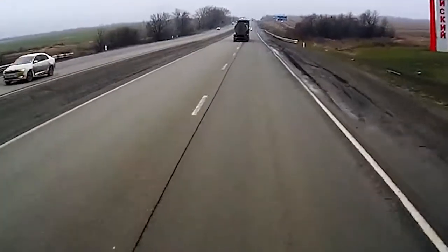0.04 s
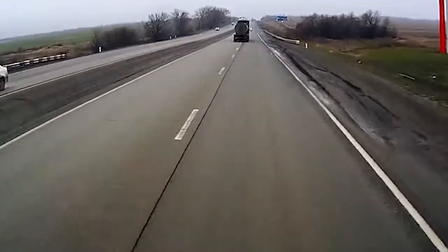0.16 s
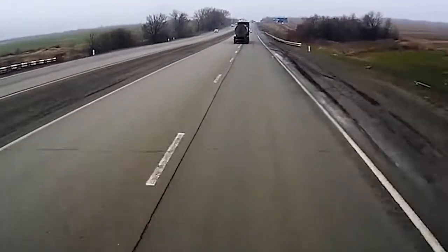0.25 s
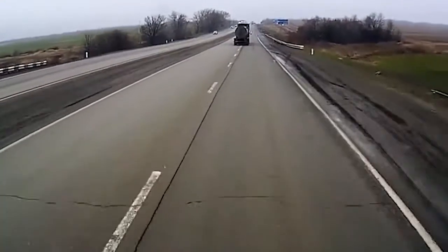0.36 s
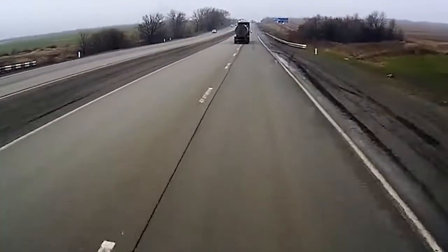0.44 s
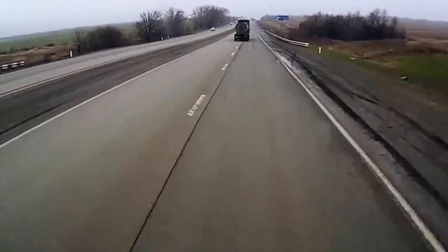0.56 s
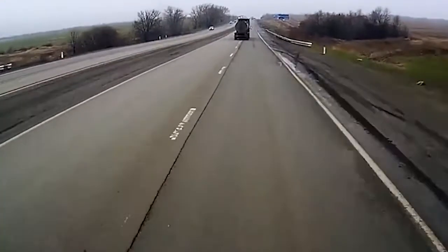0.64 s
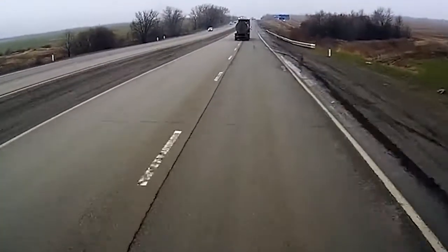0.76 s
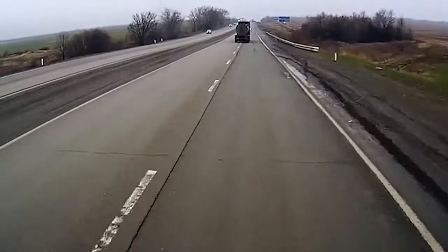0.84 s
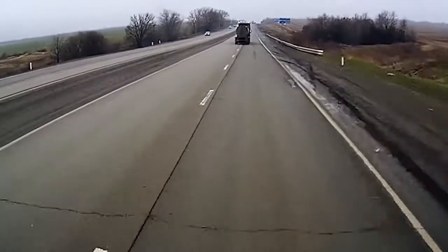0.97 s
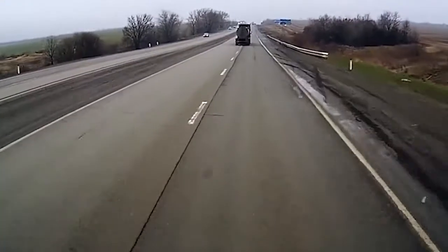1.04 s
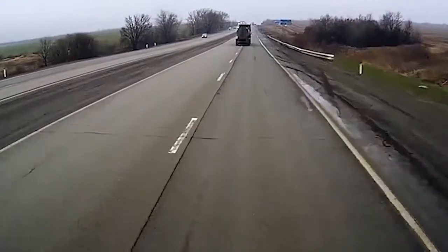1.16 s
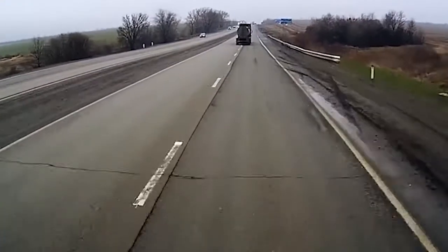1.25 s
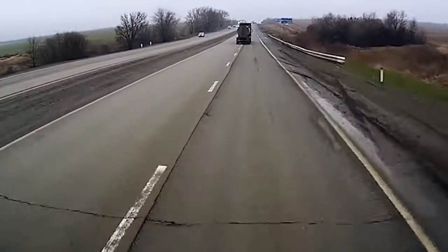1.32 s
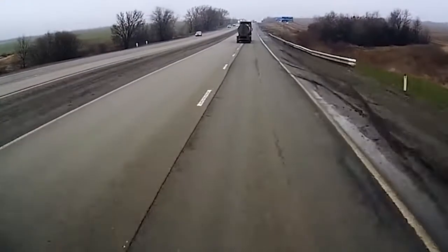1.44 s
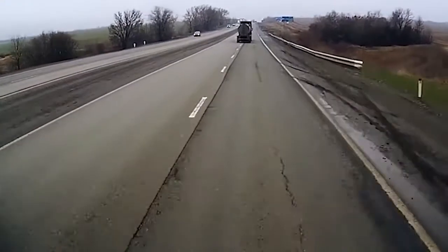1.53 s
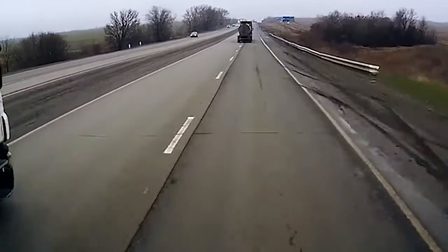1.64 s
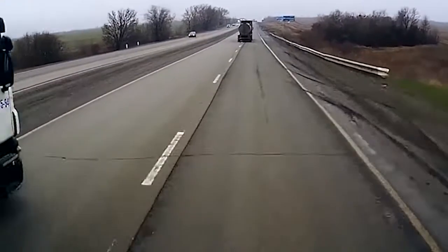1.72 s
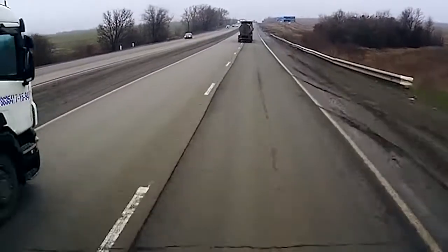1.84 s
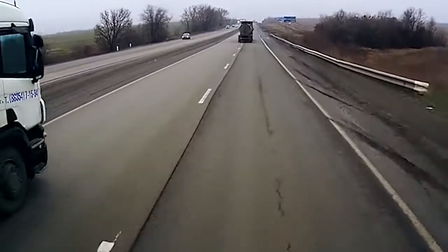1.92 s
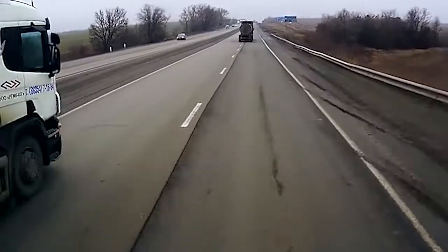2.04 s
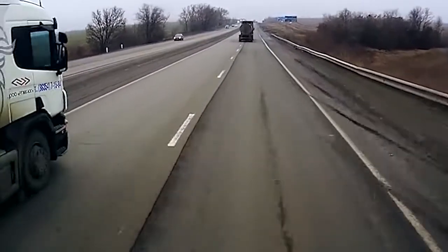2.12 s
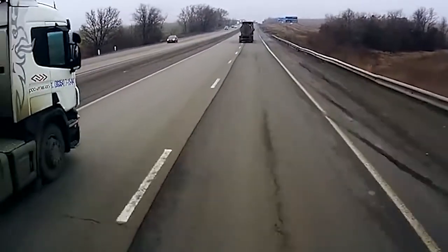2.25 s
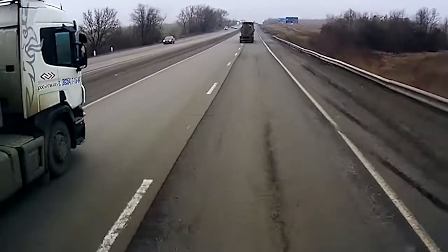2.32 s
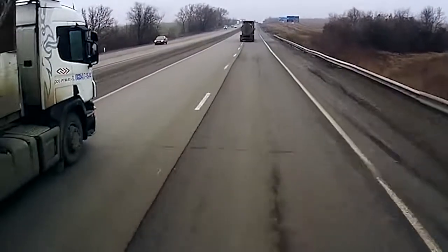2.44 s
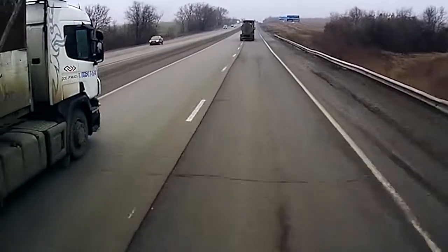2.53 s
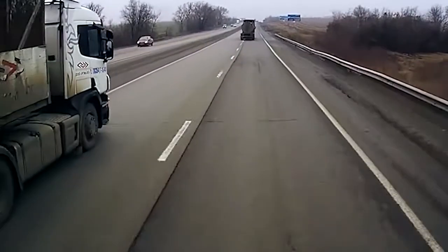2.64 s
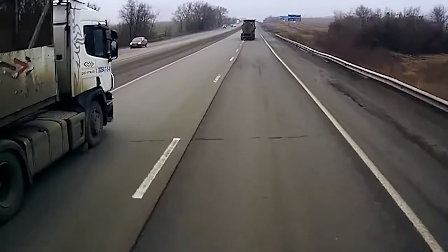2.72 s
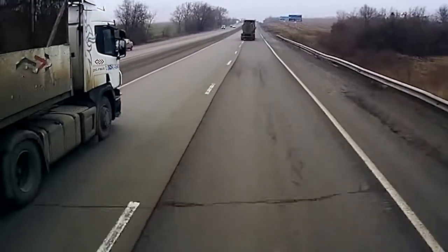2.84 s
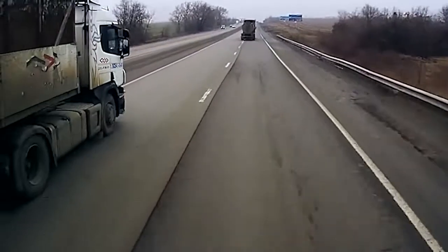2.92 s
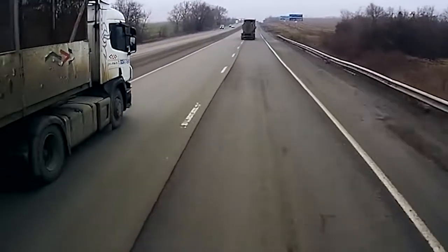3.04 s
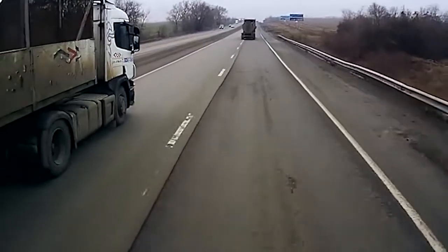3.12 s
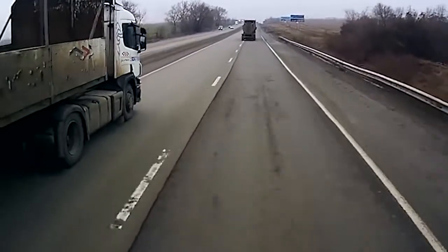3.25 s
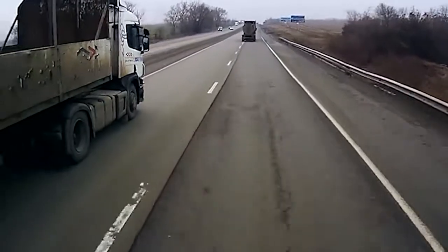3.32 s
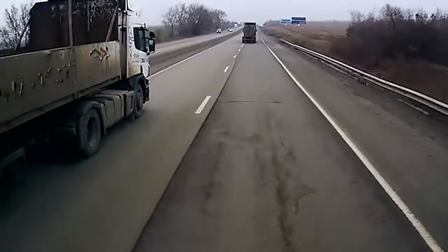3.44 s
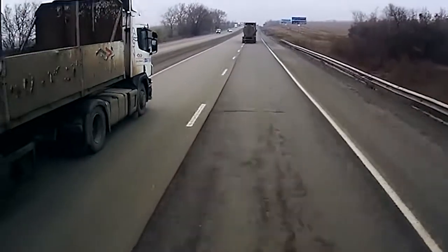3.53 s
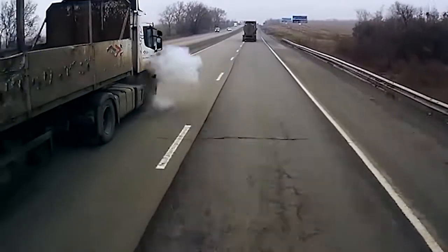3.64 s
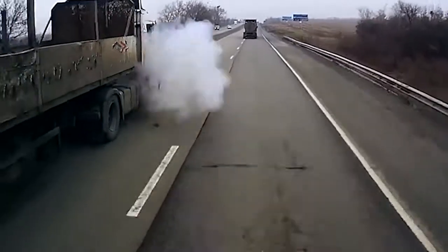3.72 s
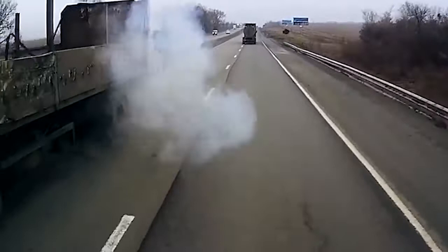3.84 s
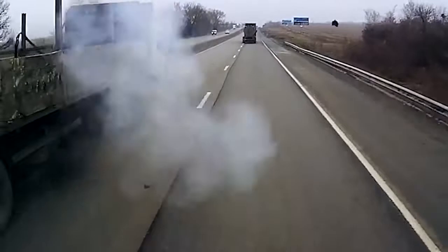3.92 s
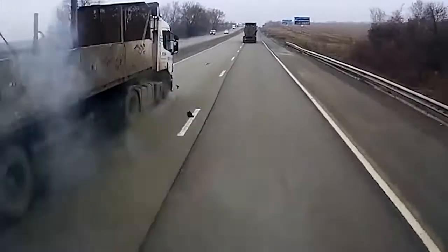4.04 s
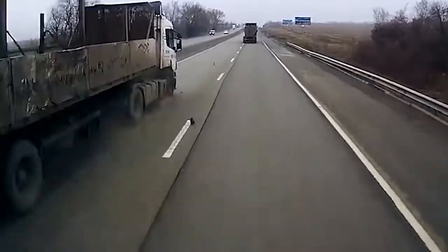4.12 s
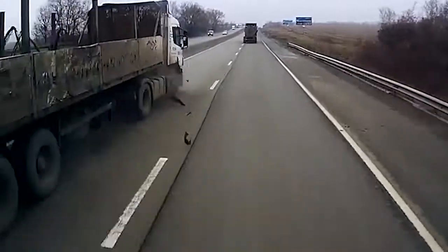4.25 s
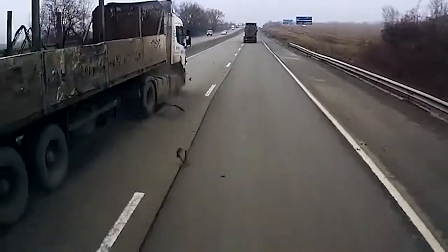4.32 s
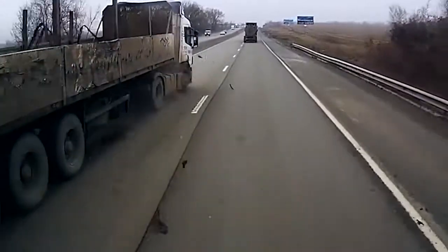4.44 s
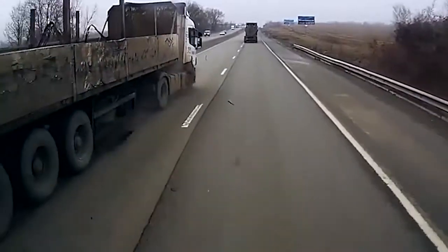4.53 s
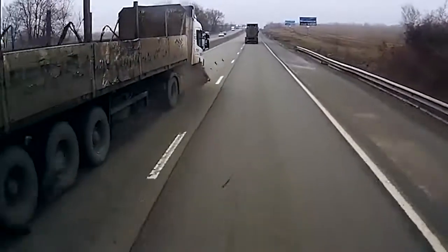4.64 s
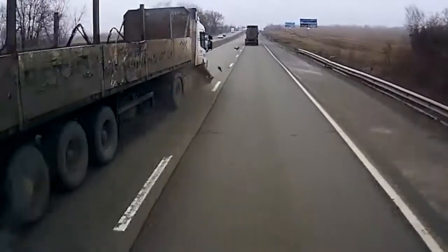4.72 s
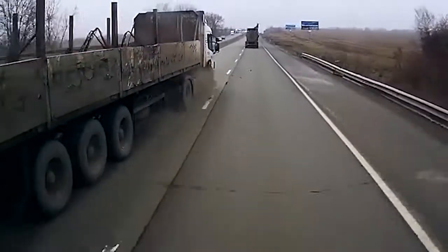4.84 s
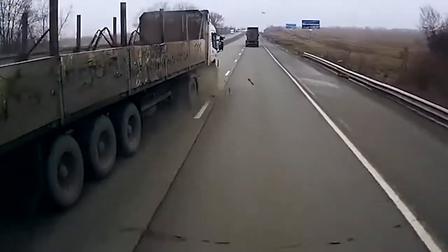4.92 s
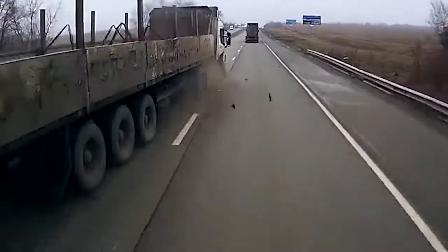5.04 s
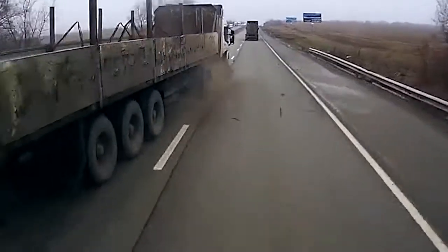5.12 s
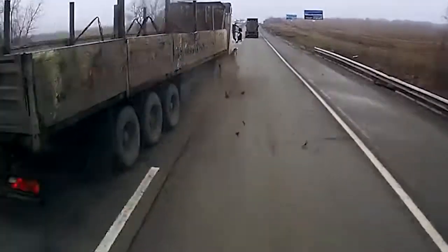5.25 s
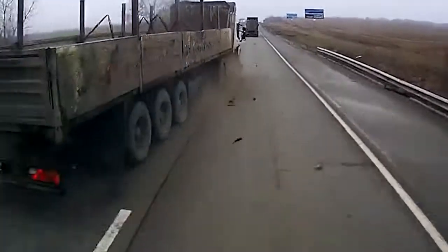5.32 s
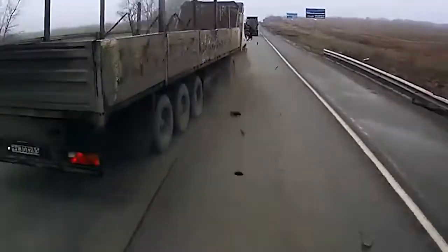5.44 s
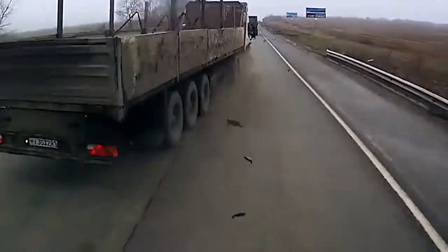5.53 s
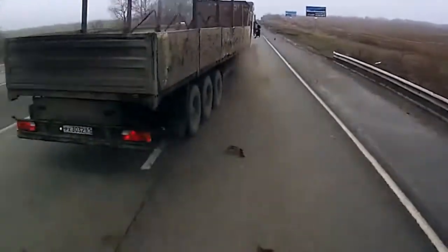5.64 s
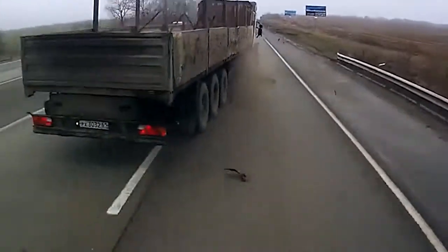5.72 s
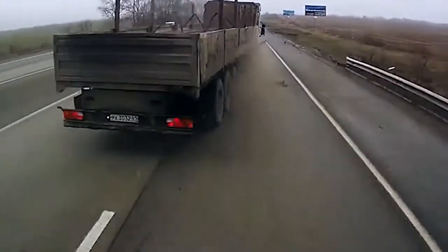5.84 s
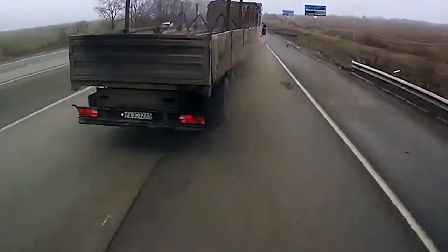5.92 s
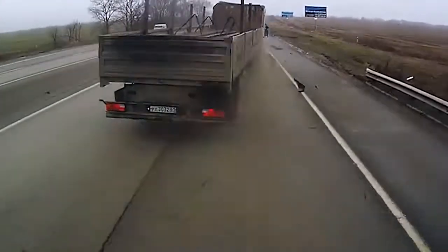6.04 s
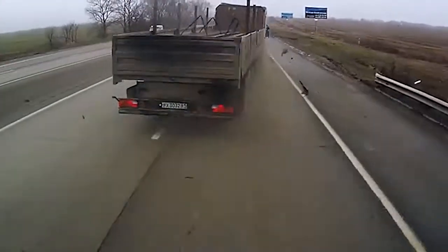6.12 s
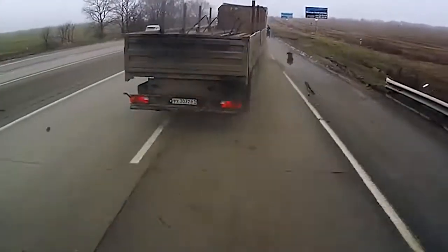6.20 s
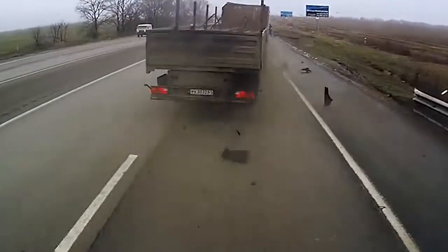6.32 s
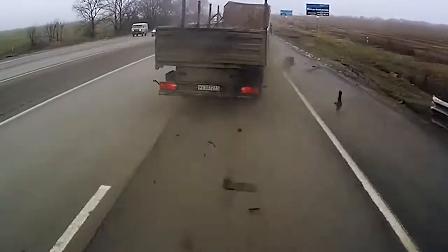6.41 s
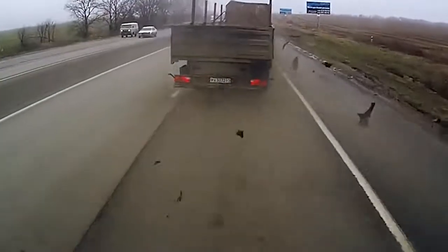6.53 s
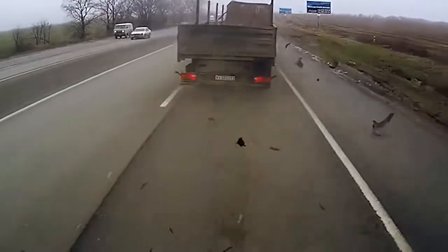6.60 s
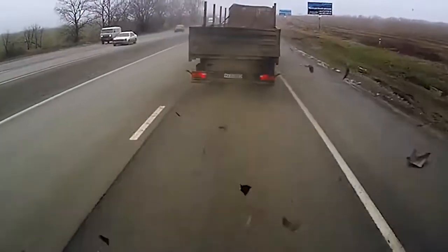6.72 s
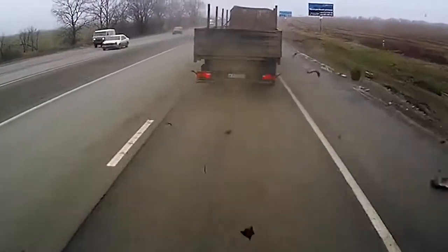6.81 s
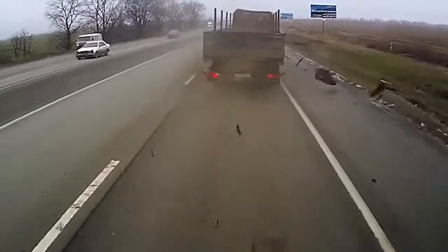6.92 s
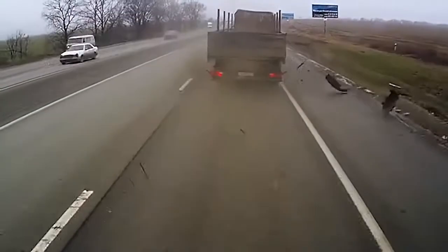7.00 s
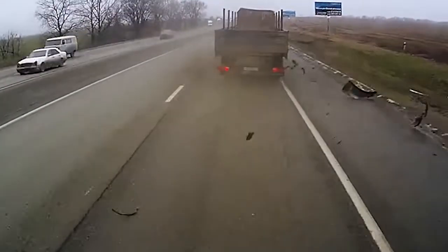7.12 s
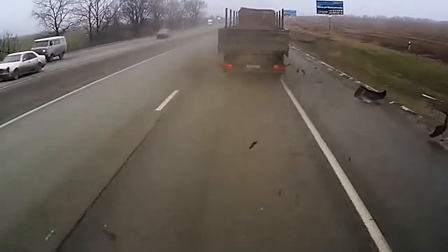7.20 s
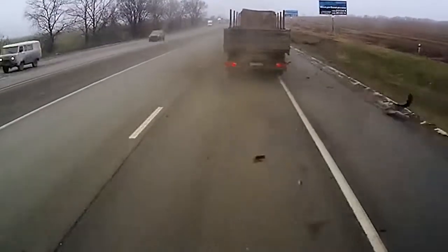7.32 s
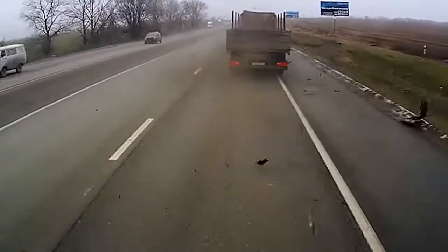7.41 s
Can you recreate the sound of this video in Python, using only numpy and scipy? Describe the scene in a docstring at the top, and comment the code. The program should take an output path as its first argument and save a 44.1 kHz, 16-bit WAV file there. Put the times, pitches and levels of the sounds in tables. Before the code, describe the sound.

A dashboard microphone in an enclosed cab hears deep rumble, dull road roar and wavering tyre whine. Nearly four seconds in, a nearby tyre explodes in a rapid volley of shocks, distorted and boomy, with cracking and rattling. A low rough drone and patchy scuffing follow, with grit and tiny plastic squeaks. Two seconds later, tread slaps the bodywork in quick deep thuds, panels shudder, and last pieces knock and tick over softening road noise.

```python
"""Tyre burst beside a lorry cab

Inside a lorry cab at highway speed, filtered noise makes rumble and roar as an articulated truck overtakes.
One of its tyres bursts: shock fronts and ringing modes boom in the cab and overload the microphone input.
The flat tyre drones and scuffs as narrow-band and patchy noise. A heavy strip of tread thuds as dying sines;
smaller pieces clatter and tick as bursts of ringing noise, over singing treads, squeaks and a panel hum."""
import sys
import numpy as np
from scipy import signal
from scipy.fft import rfft, irfft, next_fast_len
from scipy.io import wavfile
from scipy.ndimage import uniform_filter1d

SR = 44100
rng = np.random.default_rng(int(sys.argv[2]) if len(sys.argv) > 2 else 0)


def file_out(sig):
    """Save sig as 16-bit WAV at sys.argv[1]."""
    # one column per channel
    cols = np.atleast_2d(sig).T
    # limit, then scale
    lim = np.clip(cols, -1, 1)
    pcm = np.round(lim * 32767).astype(np.int16)
    wavfile.write(sys.argv[1], SR, pcm)


N = 329427
TIME = np.arange(N) / SR  # s

# Spectra give relative density in dB per Hz. Swells are bells: width is from the peak to 1/e of the lift.

# shock fronts of the blast and its echoes off trailer and road:
# (t/s, push level/dB, length/s, rise/s, signed strength: + push first, - suction first)
BLAST = [(3.8294, 1.5, 0.005, 0.00072, 0.86), (3.8349, -4, 0.0025, 0.00029, -0.96),
         (3.842, -8, 0.0036, 0.00033, 1), (3.8506, -11, .002, 0.00052, -0.95),
         (3.856, -10, 0.0034, 0.0015, 1), (3.869, -12, .0018, 0.00042, -1),
         (3.879, -12.5, 0.0061, 0.0014, 1), (3.883, -7.5, 0.0029, 0.00038, 1),
         (3.888, -10, 0.0066, 0.00044, -1.2), (3.903, -4.5, 0.0052, 0.0013, 1),
         (3.917, -7.5, 0.0027, 0.0012, -1.1), (3.932, -7.5, 0.0038, 0.00064, 0.96)]
# air modes of the cab: (f/Hz, level/dB, t60/s)
CAB_MODES = [(44.6, -12.5, 0.16), (64.6, -5.5, 0.12), (133.4, -13, 0.21), (263, -7.5, 0.069)]
# casing rips and trim rattles: (t/s, level/dB, tearing time/s, t60/s, tilt/dB per octave)
CRACKS = [(3.8352, -20, 0.0066, 0.035, -2.5), (3.841, -25.5, 0.0085, 0.021, 1),
          (3.855, -40, .002, 0.052, 7), (3.867, -37, .002, 0.036, 1), (3.877, -42, .004, 0.2, 6.5),
          (3.886, -26.5, 0.0062, 0.035, -0.5), (3.918, -46, .002, .04, 9), (3.9295, -37.5, .004, 0.069, 4)]
# spectrum of a crack: (f/Hz, level/dB)
CRACK_SPECTRUM = [(80, 1), (260, -5), (450, 2), (830, 4.5), (1100, -16), (1500, -12.5), (2200, -19),
                  (3100, -19.5), (4000, -34), (5800, -36), (7500, -45), (15000, -57)]

# the flat tyre: (start t/s, attack/s, pulling-away t/s, release/s)
FLAPPING = (3.88, 0.15, 6.38, 0.047)
DRONE_HZ, DRONE_SAG_HZ_PER_S = 314, 26  # pitch at the start, and its fall as the wheel slows
DRONE_DB, DRONE_FAR_DB = -37, -4.5  # level nearby, and the change far ahead
SCUFF_DB, SCUFF_FAR_DB = -44, -9
# the carcass folds under the rim and drones louder: (peak t/s, width/s, extra level/dB)
FOLDS = [(4.145, 0.02, 12), (4.7, 0.028, 8), (4.98, 0.05, 4.5), (5.61, 0.021, 7), (6.13, 0.07, 8.5)]
# spectrum of the scuffing shreds: (f/Hz, level/dB)
SCUFF_SPECTRUM = [(250, -8), (400, 9), (480, 12.5), (560, 21.5), (660, 19.5), (800, 10), (1130, -15),
                  (1600, 7.5), (2200, -3), (3000, -3.5), (3600, -15), (5300, -17), (6500, -32.5),
                  (9000, -27.5), (11000, -37), (15000, -35.5)]
# shreds drag on the road and scuff louder: (peak t/s, width/s, extra level/dB)
DRAGS = [(4.1, 0.035, 3.5), (4.8, 0.09, 3.5), (7.3, 0.071, 6)]

# slaps of a heavy strip of tread on the body: (t/s, level/dB, pitch ratio)
THUMPS = [(5.876, -12.5, 0.34), (5.884, -10, 0.92), (5.899, -7, 1.04), (5.9083, -9, 1.07),
          (5.9336, -9.5, 1), (5.943, -11, 1), (5.9584, -11.5, 1), (5.9856, -12.5, 0.98), (6.020, -19, 1),
          (6.043, -17.5, 1)]
# modes of the lorry body: (f/Hz, level/dB, t60/s)
BODY_MODES = [(51.3, -9.5, 0.5), (120.2, -4.5, 0.2), (138, -14, .3), (163.8, -4, 0.22),
              (240.7, -10.5, 0.26), (341, -13.5, 0.17), (388, -13, 0.15)]
RUBBER_CONTACT_S = .00025  # rounding time of a soft landing
# spectrum of the panels shuddering after a thump: (f/Hz, level/dB)
SHUDDER_SPECTRUM = [(40, -25), (140, 4), (250, 5.5), (390, -8.5), (520, -28), (1500, -56), (5000, -99)]

# fragments strike the front panels:
# (t/s, level/dB, scraping time/s, t60/s, rise/s, tilt/dB per octave, own note f/Hz, note level/dB)
KNOCKS = [(4.728, -33, .004, 0.12, .001, -9, 480, 7), (4.843, -29, 0.0032, 0.078, .002, -5, 894, 10),
          (5.873, -28, 0.0032, 0.038, .0008, 2, 1030, 9),
          (5.878, -32.5, .005, 0.069, 0.0011, 5.5, 1770, 11),
          (5.895, -30.5, 0.0096, .05, 0.00074, 0, 1110, 5), (5.912, -34, 0.0054, 0.1, .001, 2, 1210, 9),
          (6.121, -35, 0.0057, 0.088, .003, 0, 790, 8), (6.14, -31.5, 0.0062, 0.077, 0.0039, 3.5, 1880, 16),
          (6.181, -31, .015, 0.046, 0.005, 4, 705, 15), (6.197, -27, 0.021, 0.085, 0.0013, 1, 755, 3),
          (6.229, -31, 0.015, 0.047, 0.0012, -0.5, 1660, -3), (6.387, -33, .002, .04, .001, -9, 660, 14),
          (6.9448, -32.5, .004, 0.08, 0.00088, 1.5, 2970, 0),
          (6.950, -26.5, 0.012, 0.086, .0006, -0.4, 2000, 2),
          (6.969, -28, .006, 0.17, 0.0016, -3.5, 1080, 1), (6.9955, -28, 0.0036, 0.11, .0006, -1, 1800, -1)]
# spectrum of a struck panel: (f/Hz, level/dB)
PANEL_SPECTRUM = [(150, -10), (380, 15.5), (560, -1.5), (760, 5.5), (1050, -1.5), (1800, -4.5),
                  (2300, -14.5), (3000, -17), (3800, -28), (5200, -30.5), (6800, -46), (9000, -49.5),
                  (15000, -69)]
# grit on the windscreen: (t/s, level/dB, t60/s, tilt/dB per octave)
TICKS = [(2.143, -51, .04, 2), (2.186, -55, .04, 2), (3.678, -54, 0.023, 3), (3.955, -48.5, 0.071, 1),
         (4.087, -40.5, .057, -5), (4.82, -47, 0.036, -1), (5.026, -46, 0.048, 0), (5.228, -52, 0.19, 3),
         (5.352, -52, .025, 12), (5.405, -34.5, 0.015, -0.5), (5.482, -45, 0.092, -2),
         (5.709, -42, 0.036, -2), (5.726, -38, 0.07, -1.5), (5.793, -44, 0.24, -4),
         (5.816, -43, 0.057, -2.5), (5.849, -40, 0.025, 0.5), (6.05, -53, 0.23, 3.5), (6.196, -46, .07, 10),
         (6.251, -55, 0.0083, 12), (6.341, -43, 0.031, -3), (6.496, -57, 0.034, 3), (6.661, -52, .025, 3),
         (6.723, -50.5, .025, 1), (6.788, -46.5, 0.043, 0), (7.188, -43.5, 0.026, -1.5),
         (7.269, -39, 0.027, -6), (7.282, -42, 0.034, -3.5), (7.304, -45.5, .07, -7),
         (7.401, -44.5, 0.035, -6)]
# spectrum of a tick: (f/Hz, level/dB)
GRIT_SPECTRUM = [(500, -20), (1500, 11), (2100, -1.5), (2600, 6), (3500, -6), (5300, -7.5), (6800, -21),
                 (9000, -18), (11000, -36), (15000, -28)]
# finer grit at random: mean rate, centre level, spread either way, and decay
SPRAY_PER_S, SPRAY_DB, SPRAY_SPREAD_DB, SPRAY_T60_S = 7, -50, 3, 0.043

# spectrum of the cab rumble: (f/Hz, level/dB)
RUMBLE_SPECTRUM = [(8, -30.5), (22, 8), (45, -8), (68, -1.5), (95, -8), (125, -9), (190, -13), (260, -22),
                   (420, -32.5), (900, -81.5)]
# spectrum of the tyre roar on the road: (f/Hz, level/dB)
ROAD_SPECTRUM = [(190, -18.5), (255, 3), (430, 1), (540, -5), (660, -5), (850, -6.5), (1010, -8.5),
                 (1130, -15), (1450, -17), (1850, -21), (2200, -32), (3000, -31.5), (3500, -42.5),
                 (4500, -44), (5300, -42), (6400, -58), (15000, -71.5)]
RUMBLE_DB, ROAD_DB = -25, -34.5  # cruising levels
# the lorry slows from this moment, and its rumble, roar and tread notes fade
SLOWING_S = 5.2
RUMBLE_FADE_DB_PER_S, ROAD_FADE_DB_PER_S, TREAD_FADE_DB_PER_S = 0.97, 3.03, 6.5
# the truck alongside lifts the roar; without it the roar drops
ARRIVES_S, ARRIVAL_S, LEAVES_S, LEAVING_S, ALONE_DB = 0, 0.9, 4.5, 4.34, -3
# air from the burst and the trailer's wake buffets the cab: (peak t/s, width/s, extra rumble level/dB)
BUFFETS = [(4.15, 0.16, 5), (4.38, 0.063, 1.5), (4.76, 0.068, 3.5), (6.2, 0.036, 4.5)]
# rubber crumbs swell the roar: (peak t/s, width/s, extra level/dB)
CRUMBS = [(4.835, .07, 5)]

# singing tyre treads, low to top: (f/Hz, width/Hz)
TREAD_NOTES = [(389.5, 8), (480, 14), (747, 15), (1030, 110)]
# steady level of the low, middle, high and top note: level/dB
TREAD_DB = (-41.5, -56.5, -51.5, -67.5)
# swells of the low tread note: (peak t/s, width/s, extra level/dB)
LOW_SWELLS = [(.12, 0.084, 1), (.52, 0.097, 5), (1.08, 0.19, 6.5), (1.55, 0.36, 9.5), (3.05, 0.096, 6.5),
              (4.05, 0.64, 6.5)]
# swells of the middle tread note: (peak t/s, width/s, extra level/dB)
MIDDLE_SWELLS = [(4.47, 0.11, 15), (4.789, 0.084, 20.5), (5.19, .06, 10)]
# swells of the high tread note: (peak t/s, width/s, extra level/dB)
HIGH_SWELLS = [(1.45, 0.1, 7.8), (2.0, 0.09, 9.8), (2.43, .06, 8.2), (2.72, 0.089, 2.5), (3.1, 0.37, 13.8),
               (3.62, 0.068, 5.5)]
# swells of the top tread note: (peak t/s, width/s, extra level/dB)
TOP_SWELLS = [(1.45, 1, 15), (3, .45, 14.5)]

HUM_HZ, HUM_WIDTH_HZ, HUM_DB = 339, 37, -49.5  # humming cab panel
# swells of the panel hum: (peak t/s, width/s, extra level/dB)
HUM_SWELLS = [(5.56, 0.12, 12.4), (6.12, .05, 12), (7.35, 0.15, 8)]
# squeaks of the cab trim: (t/s, length/s, from f/Hz, to f/Hz, level/dB, roughness 0-1)
SQUEAKS = [(0.71, 0.019, 5480, 5650, -56.5, .2), (0.733, .04, 7900, 7980, -72, .1),
           (3.951, 0.017, 5860, 5970, -59, 0.7), (5.214, 0.059, 5760, 5850, -62, 0.7),
           (5.212, 0.076, 7950, 7950, -69, 1), (5.248, 0.067, 4760, 5530, -58, 0.85),
           (5.288, .034, 6250, 6500, -68, 1), (5.303, 0.05, 7850, 7950, -66, .4)]

# stereo width of the sharp sounds: lowest pitch, lateness, and levels
SPREAD_HZ, SPREAD_S = 1000, .003
BANG_SPREAD_DB, CLATTER_SPREAD_DB = -12, -34.5
# faint high whine: (f/Hz, width/Hz, level/dB)
WHINE = [(7490, 120, -86), (14990, 250, -87)]
# spectrum of the faint noise, independent on each channel: (f/Hz, level/dB)
FAINT_NOISE_SPECTRUM = [(30, 50.5), (70, 36.5), (170, -3.5), (1500, -6.5), (3000, -8), (5000, -6),
                        (7000, 1), (11000, -0.5), (15000, -8.5)]
FAINT_NOISE_DB = -61.5
FULL_SCALE = .44  # amplitude at which the input clips
EDGE_HZ = 15400  # upper band limit


def blowout(cab_db=0, rasp_db=3.0):
    """Push-and-suction shock fronts set the cab air booming; the casing rips and the trim rattles."""
    shocks, rattle = np.zeros(N), np.zeros(N)
    t = TIME[:SR]
    boom = amp(cab_db) * ring(CAB_MODES)
    for s, push_db, length, rise, sign in BLAST:
        shock = (1 - t / length) * np.exp(-t / length)
        add(shocks, s, sign * amp(push_db) * blunt(shock + boom, rise))
    for s, db, tearing, t60, tilt_db in CRACKS:
        add(rattle, s, amp(db) * burst(CRACK_SPECTRUM, t60, 0.0005, tilt_db, hold=tearing))
    rasp = amp(rasp_db * np.tanh(drift(500)))
    return shocks + rattle * rasp


def flat_tyre(drone_width_hz=95, flap_db=2.5, grain_db=0.0, bounce=0.19):
    """The carcass drones on the road while loose shreds scuff unevenly; both drop as the truck pulls ahead."""
    start, attack, leaves, release = FLAPPING
    flat, far = ramp(start, attack), ramp(leaves, release)
    hz = DRONE_HZ - DRONE_SAG_HZ_PER_S * np.maximum(TIME - start, 0)
    drone_db = DRONE_DB + DRONE_FAR_DB * far + swells(FOLDS)
    drone = amp(drone_db) * band(hz, drone_width_hz)

    scuff = patchy(noise(SCUFF_SPECTRUM, ripple_db=1.4), 1.6)
    scuff = scuff * amp(flap_db * drift(23) + grain_db * drift(250))
    # a lengthening reflection sweeps a comb downwards
    scuff = scuff + bounce * np.interp(TIME - 1 / hz, TIME, scuff)
    scuff_db = SCUFF_DB + SCUFF_FAR_DB * far + swells(DRAGS)
    return flat * (drone + amp(scuff_db) * unit(scuff))


def thud(shudder_db=-18.0, shudder_t60=0.49):
    """Soft rubber shoves the body, then slaps it: its modes boom at shifting pitch and the panels shudder."""
    out = np.zeros(N)
    for s, db, pitch in THUMPS:
        modes = [(hz * pitch, mode_db, t60) for hz, mode_db, t60 in BODY_MODES]
        add(out, s, -amp(db) * blunt(ring(modes), RUBBER_CONTACT_S))
        add(out, s, amp(db + shudder_db) * burst(SHUDDER_SPECTRUM, shudder_t60, 0.0055))
    return out


def debris(clatter_db=3.5, note_q=6.5):
    """Fragments strike and scrape over the panels, each with its own note, and grit ticks on the glass."""
    knocks, ticks = np.zeros(N), np.zeros(N)
    for s, db, scraping, t60, rise, tilt_db, note_hz, note_db in KNOCKS:
        note = [(note_hz, note_hz / note_q, note_db)]
        add(knocks, s, amp(db) * burst(PANEL_SPECTRUM, t60, rise, tilt_db, note, hold=scraping))
    for s, db, t60, tilt_db in TICKS:
        add(ticks, s, amp(db) * burst(GRIT_SPECTRUM, t60, 0.00033, tilt_db))
    clatter = amp(clatter_db * np.tanh(drift(450)))
    return knocks * clatter + ticks


def spray(tilt_db=-2.5):
    """Fine grit thrown up by the flat tyre patters on the glass until the truck pulls away."""
    start, _, leaves, _ = FLAPPING
    lands = (rng.random(N) < SPRAY_PER_S / SR) * (TIME > start) * (TIME < leaves)
    sizes = amp(SPRAY_DB + SPRAY_SPREAD_DB * rng.uniform(-1, 1, N))
    tick = burst(GRIT_SPECTRUM, SPRAY_T60_S, .0006, tilt_db)
    return signal.oaconvolve(lands * sizes, tick)[:N]


def driving(road_patch_db=1, rumble_waver_db=1):
    """Cab rumble under tyre roar: the truck alongside lifts the roar, and both fade as the lorry slows."""
    alone = 1 - ramp(ARRIVES_S, ARRIVAL_S) + ramp(LEAVES_S, LEAVING_S)
    rumble_db = RUMBLE_DB - RUMBLE_FADE_DB_PER_S * slowed() + swells(BUFFETS)
    rumble_db = rumble_db + rumble_waver_db * drift(7.4)
    road_db = ROAD_DB - ROAD_FADE_DB_PER_S * slowed() + ALONE_DB * alone + swells(CRUMBS)
    rumble = noise(RUMBLE_SPECTRUM) * amp(rumble_db)
    roar = patchy(noise(ROAD_SPECTRUM, ripple_db=4.0), road_patch_db) * amp(road_db)
    return rumble + roar


def treads(fuzz=0.49, waver_db=2):
    """Tread blocks sing four wavering notes with fuzzy skirts, swelling in spells and fading with slowing."""
    out = np.zeros(N)
    note_swells = (LOW_SWELLS, MIDDLE_SWELLS, HIGH_SWELLS, TOP_SWELLS)
    for (hz, width), steady_db, rises in zip(TREAD_NOTES, TREAD_DB, note_swells):
        db = steady_db + swells(rises) - TREAD_FADE_DB_PER_S * slowed()
        phase = 2 * np.pi * np.cumsum(hz + width / 2 * drift(21.34)) / SR
        note = np.sqrt(2) * np.sin(phase)
        out += amp(db + waver_db * drift(31)) * unit(note + fuzz * band(hz, 44))
    return out


def panel_hum():
    """A cab panel resonates in a narrow band, humming louder in spells once the tyre is flat."""
    start, attack, _, _ = FLAPPING
    return ramp(start, attack) * amp(HUM_DB + swells(HUM_SWELLS)) * band(HUM_HZ, HUM_WIDTH_HZ)


def squeaks(waver_hz=120, rasp_db=5, octave_db=-14):
    """Short glides of rubbing plastic; the rough ones waver, rasp and gain a faint octave."""
    out = np.zeros(N)
    waver, rasp = waver_hz * drift(400), rasp_db * drift(500)
    for s, length, from_hz, to_hz, db, rough in SQUEAKS:
        size = int(length * SR)
        now = slice(round(s * SR), round(s * SR) + size)
        hz = np.linspace(from_hz, to_hz, size) + rough * waver[now]
        phase = 2 * np.pi * np.cumsum(hz) / SR
        tone = np.sin(phase) + rough * amp(octave_db) * np.sin(2 * phase)
        add(out, s, amp(db + rough * rasp[now]) * np.hanning(size) * tone)
    return out


def amp(db):
    """Decibels to gain."""
    return 10 ** (np.asarray(db) / 20)


def unit(x):
    """Scales to an rms of one."""
    return x / np.sqrt(np.mean(x ** 2) + 1e-20)


def add(mix, s, sound):
    """Lays a sound into the mix at s seconds."""
    part = mix[round(s * SR):][:len(sound)]
    part += sound[:len(part)]


def ramp(start, length):
    """Rises from zero to one over the length, then holds."""
    return np.clip((TIME - start) / length, 0, 1)


def swells(rows):
    """Bell-shaped rises in level, in dB."""
    return sum(db * np.exp(-((TIME - s) / width) ** 2) for s, width, db in rows)


def slowed():
    """Seconds since the lorry began to slow."""
    return np.maximum(TIME - SLOWING_S, 0)


def noise(spectrum, size=N, tilt_db=0, modes=(), ripple_db=0):
    """Noise of a given spectrum, tilted per octave, with added peaks and a ripple of many small resonances."""
    hz = np.fft.rfftfreq(size, 1 / SR) + 1  # clear of zero for the logarithm
    f, db = np.transpose(spectrum)
    db = np.interp(np.log(hz), np.log(f), db) + tilt_db * np.log2(np.maximum(hz, f[0]))
    ripple = rng.standard_normal(size=500)
    ripple = np.interp(hz, np.linspace(0, SR / 2, len(ripple)), ripple)
    db = db + ripple_db * ripple * hz / (hz + 600)  # shallower in the bass
    peaks = sum(amp(d) / (1 + (2 * (hz - m) / w) ** 2) for m, w, d in modes)
    random_phase = np.exp(2j * np.pi * rng.random(len(hz)))
    return unit(irfft(amp(db) * (1 + peaks) * random_phase, size))


def drift(rate_hz):
    """Smooth random motion of rms one, rolled off steeply above the rate."""
    size = next_fast_len(N)
    hz = np.fft.rfftfreq(size, 1 / SR)
    spectrum = rfft(rng.standard_normal(size)) / (1 + (hz / rate_hz) ** 4)
    return unit(irfft(spectrum, size)[:N])


def band(hz, width_hz):
    """A narrow, fuzzy tone that follows a pitch."""
    phase = 2 * np.pi * np.cumsum(hz * np.ones(N)) / SR
    return unit(drift(width_hz / 2) * np.cos(phase) + drift(width_hz / 2) * np.sin(phase))


def ring(modes):
    """Dying sines of a struck object."""
    t = TIME[:SR]
    return sum(amp(db - 60 * t / t60) * np.sin(2 * np.pi * hz * t) for hz, db, t60 in modes)


def burst(spectrum, t60, rise, tilt_db=0, modes=(), ripple_db=2, hold=0):
    """Dense ringing of a blow: a quick rise, a hold while contact lasts, and an exponential fall."""
    t = TIME[:SR // 3]
    x = noise(spectrum, len(t), tilt_db, modes, ripple_db)
    x = x / np.sqrt(uniform_filter1d(x ** 2, size=220, mode="wrap") + 1e-9)  # evens out the level
    attack = 1 - np.exp(-t / max(rise, 1 / SR))
    return x * attack * amp(-60 * np.maximum(t - hold, 0) / abs(t60))


def blunt(x, rise):
    """Rounds a sharp front with two smoothing poles of the rise time."""
    r = np.exp(-1 / (rise * SR))
    return signal.lfilter([(1 - r) ** 2], [1, -2 * r, r * r], x)


def patchy(x, depth_db):
    """Lets patches a few hundred Hz wide swell and fade on their own."""
    z = signal.stft(x, nperseg=512)[2]
    field = uniform_filter1d(rng.standard_normal(z.shape), size=4, axis=0)  # across pitch
    field = uniform_filter1d(field, size=7, axis=1)  # along time
    return unit(signal.istft(z * amp(depth_db * unit(field)))[1][:N])


def spread(x):
    """A slightly late copy of the treble; opposite signs on the two channels make a sound wider."""
    highpass = signal.butter(4, SPREAD_HZ, "highpass", fs=SR, output="sos")
    treble = signal.sosfilt(highpass, x)
    return np.interp(TIME - SPREAD_S, TIME, treble)


def scene():
    """All sounds meet at one microphone feeding both channels; the bang and clatter are spread wider."""
    bang, clatter = blowout(), debris()
    cab = bang + flat_tyre() + thud() + clatter + spray()
    cab = cab + driving() + treads() + panel_hum() + squeaks()
    side = spread(amp(BANG_SPREAD_DB) * bang + amp(CLATTER_SPREAD_DB) * clatter)
    return np.array([cab + side, cab - side])


def record(dry):
    """Overload flattens the tops; a faint whine and a separate noise per channel are added; treble is cut."""
    clipped = np.clip(dry, -FULL_SCALE, FULL_SCALE)
    whine = sum(amp(db) * band(hz, width) for hz, width, db in WHINE)
    faint_noise = amp(FAINT_NOISE_DB) * np.array([noise(FAINT_NOISE_SPECTRUM) for _ in dry])
    lowpass = signal.firwin(511, EDGE_HZ, window=("kaiser", 9), fs=SR)
    return signal.oaconvolve(clipped + whine + faint_noise, lowpass[None], "same")


dry = scene()
out = record(dry)
file_out(out)
```